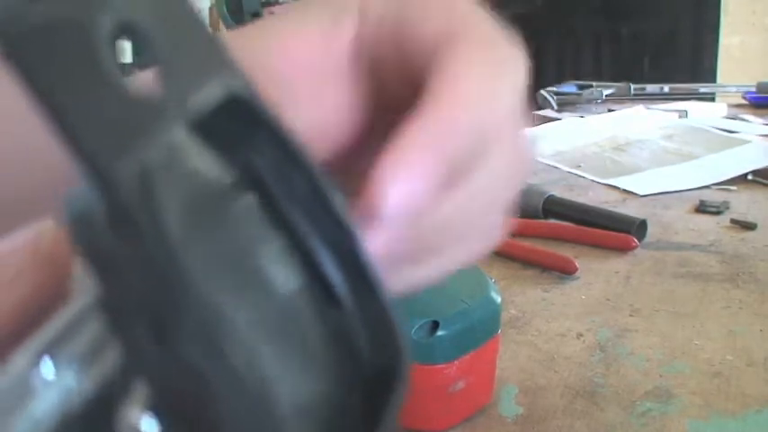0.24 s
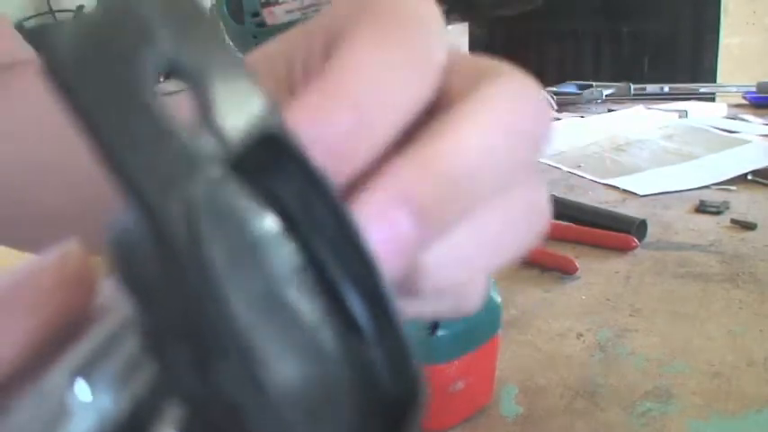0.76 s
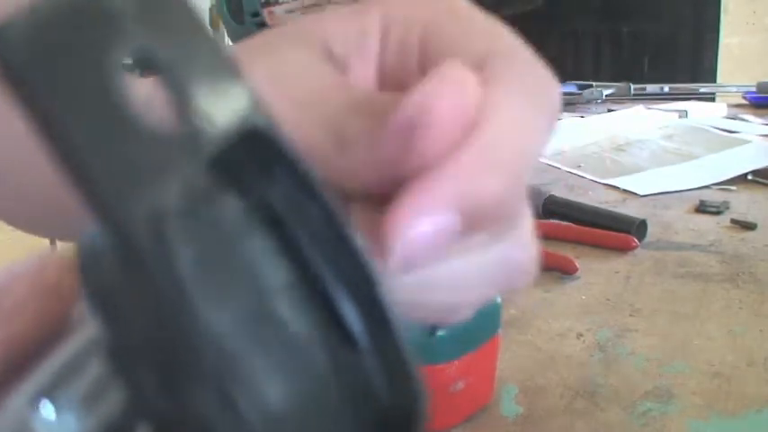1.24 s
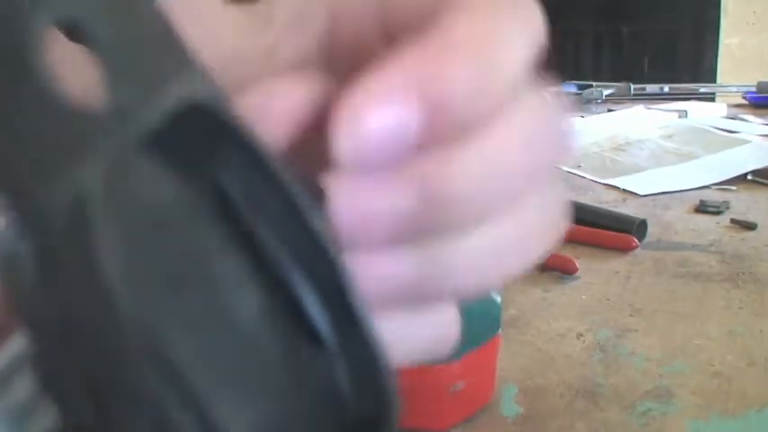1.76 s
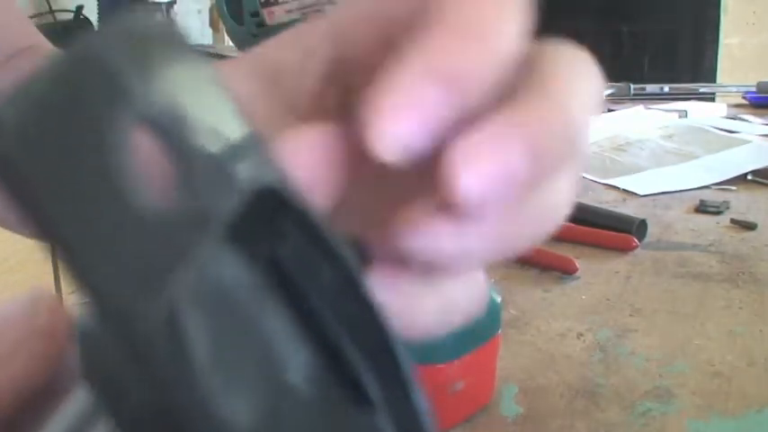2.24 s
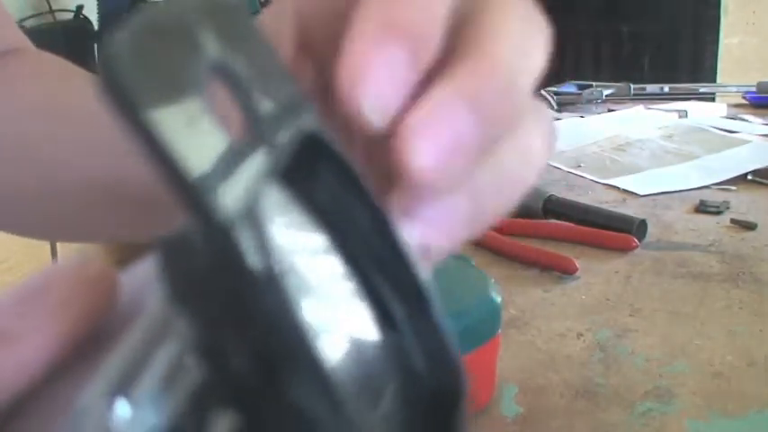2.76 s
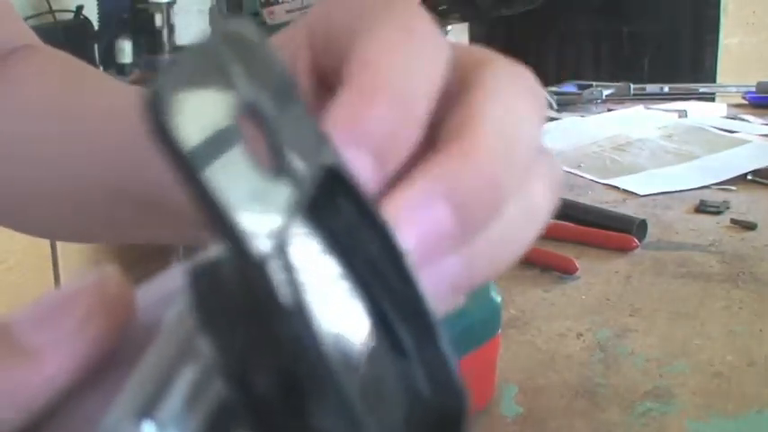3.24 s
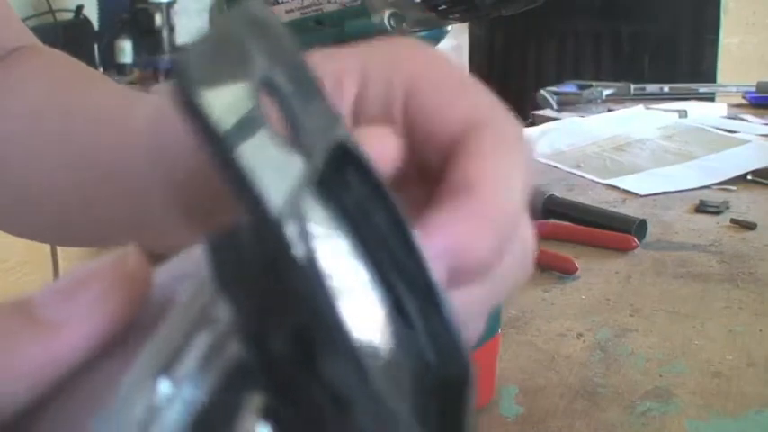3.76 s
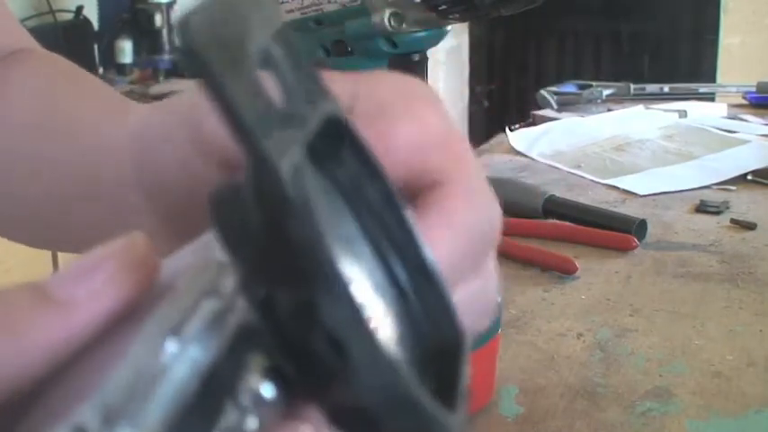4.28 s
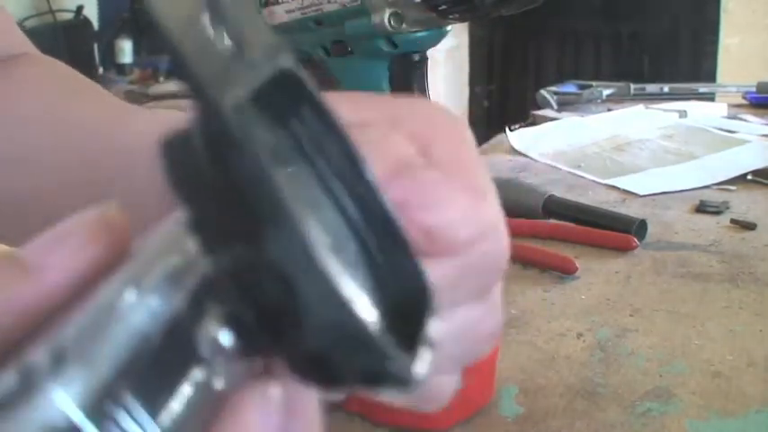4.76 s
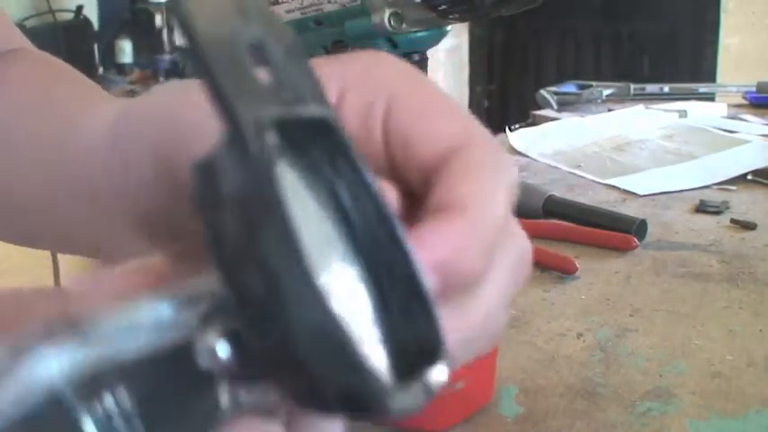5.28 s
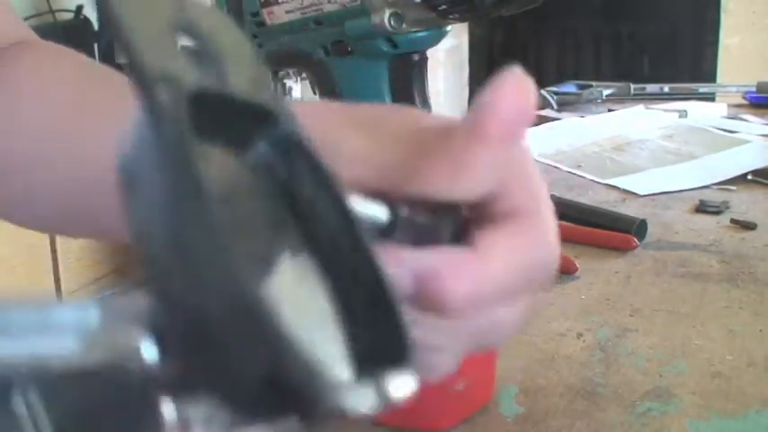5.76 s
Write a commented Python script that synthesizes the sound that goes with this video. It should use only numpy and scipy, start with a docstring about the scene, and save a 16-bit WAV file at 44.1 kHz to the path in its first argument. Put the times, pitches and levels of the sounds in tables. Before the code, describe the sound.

In a quiet workshop, hands loosen a small hollow plastic part right beside the microphone. Light ticks and skin or plastic rubs start at once, a high chirping squeak jumps out before the first second ends, and uneven taps continue. After a quieter spell, parts clatter and snap sharply, the loudest moment, then a final tap. Steady soft hiss and low throbbing hum lie beneath.

```python
"""Soft workshop hiss and hum come first, with a faint thread squeak, then rubs and taps right at the microphone.
Fingers unscrew a plastic housing from its mount, close to a small stereo microphone in a quiet workshop.
Taps, rubs and one loud clatter are noise pushes that ring the shell's modes; squeaks are stick-slip tones.
The room answers with decaying noise echoes; hiss, two beating hums and a far rumble lie beneath."""
import sys
import numpy as np
from scipy import signal
from scipy.fft import rfft, irfft
from scipy.io import wavfile
from scipy.ndimage import uniform_filter1d

SR = 44100
rng = np.random.default_rng(int(sys.argv[2]) if len(sys.argv) > 2 else 0)


def master_out(mix):
    """Clip the mix to full scale and print it as 16-bit PCM to the path in sys.argv[1]."""
    frames = np.transpose(np.atleast_2d(mix))
    ceiling = np.clip(frames, -1, 1)
    pcm = np.round(ceiling * 32767).astype(np.int16)
    wavfile.write(sys.argv[1], SR, pcm)


N = 265482
T = np.arange(N) / SR
HZ = np.arange(N // 2 + 1) * SR / N


def undb(db):
    """Decibels to gain."""
    return 10 ** (np.asarray(db) / 20)


def on_log(hz, table, column):
    """Read a column of a frequency table on a log axis."""
    table = np.array(table, float)
    return np.interp(np.log(np.maximum(hz, 1)), np.log(table[:, 0]), table[:, column])


def walk(rate):
    """Random levels held 1 / rate s and slewed twice; spread near 1."""
    hold = int(SR / rate)
    steps = np.repeat(rng.standard_normal(N // hold + 1), hold)
    return 1.7 * uniform_filter1d(uniform_filter1d(steps, hold), hold)[:N]


def pair(like):
    """Spectra of two noises, as alike in each band as the table says."""
    likeness = np.clip(on_log(HZ, like, 1), 0, 1)
    mid = rfft(rng.standard_normal(N)) * np.sqrt(1 + likeness)
    side = rfft(rng.standard_normal(N)) * np.sqrt(1 - likeness)
    return np.array([mid + side, mid - side]) / 2 ** .5


def add(out, sound, s):
    """Mix a sound in at a time in seconds."""
    i = max(int(s * SR), 0)
    out[i:i + len(sound)] += sound[:N - i]


# spectrum of the workshop hiss: [f/Hz, relative level/dB per Hz]
HISS_SPECTRUM = [(20, -16), (55, -7), (200, -4), (450, -1.5), (800, 0), (1400, -4), (2300, -6.5),
                 (4100, -14), (6400, -15), (8500, -18), (11000, -21), (12000, -17.5), (14000, -20.5),
                 (15500, -29.5)]
# how alike the hiss is at the two ports: [f/Hz, left-right likeness/0..1]
HISS_LIKENESS = [(30, 0.91), (80, .93), (150, 0.2), (300, 0.2), (700, 0.27), (3000, 0.27), (9000, 0.2),
                 (11500, 0.99)]
# two far machines that beat: [mean f/Hz, middle level/dB]
HUM_TONES = [(66.3, -77), (69.8, -74)]
# a far rumble swells and fades: [t/s, level/dB]
RUMBLE_SWELL = [(1.0, -90.5), (1.3, -81), (1.75, -65), (2.1, -68), (2.4, -90)]
HISS_DB, RUMBLE_BAND_HZ = -59, (250, 354)


def air():
    """Workshop air: hiss that swells a little, a throbbing hum of wandering tones and a passing band of rumble."""
    hiss = irfft(pair(HISS_LIKENESS) * undb(on_log(HZ, HISS_SPECTRUM, 1)), N)
    hiss = hiss * undb(0.63 * walk(3.3))
    hum = np.zeros(N)
    for hz, db in HUM_TONES:
        level = undb(db + 1.5 * walk(4.8))
        phase = 2 * np.pi * np.cumsum(hz * (1 + 0.027 * walk(5.5))) / SR
        hum += level * np.sin(phase)
    band = signal.butter(2, RUMBLE_BAND_HZ, "bandpass", fs=SR, output="sos")
    far = signal.sosfilt(band, rng.standard_normal((2, N)))
    rumble = far / far.std() * undb(np.interp(T, *np.transpose(RUMBLE_SWELL)))
    return undb(HISS_DB) * hiss / hiss.std() + hum + rumble


# the thread sticks and slips, close to the microphone: [loudest moment t/s, swell/ms, hold/ms,
# slip rate from f/Hz, slip rate to f/Hz, peak grip level/dB, fundamental level against octave/dB]
THREAD_SQUEAKS = [(.005, 8, 30, 3280, 3270, -50, -1), (0.8, 2.83, 3.43, 3750, 3080, -5.5, -5),
                  (.8068, 3.2, 4.6, 3150, 3300, -21, 4.5), (0.8202, 8, 4, 3400, 3610, -23, 6.5),
                  (0.8262, 2.6, 5.2, 3127, 3003, -7, -3.5)]
# overtones of the slip rate: [multiple, relative level/dB]
SQUEAK_OVERTONES = [(2, 1.5), (3, -13.5), (4, -21.5)]
SQUEAK_START_DB, SQUEAK_HOLD_DB = -36, -6  # against the peak
SQUEAK_DROP_MS, SQUEAK_END_MS = 1.2, 2.4


def squeaks():
    """Stick-slip at a gliding, unsteady rate, with its octave: it bites, eases, holds and lets go."""
    out, waver, flutter = np.zeros(N), walk(900), walk(700)
    for s, swell, hold, from_hz, to_hz, db, first_db in THREAD_SQUEAKS:
        ms = (T - s) * 1000
        glide = np.interp(ms, [-swell, .7 * hold], [from_hz, to_hz])
        phase = 2 * np.pi * np.cumsum(glide * (1 + 0.013 * waver)) / SR
        tone = undb(first_db) * np.sin(phase)
        for multiple, overtone_db in SQUEAK_OVERTONES:
            tone += undb(overtone_db) * np.sin(multiple * phase)
        tone *= 1 + 0.054 * rng.standard_normal(N)  # grit in the contact roughens every slip
        grip_db = np.interp(ms, [-swell, 0, SQUEAK_DROP_MS, hold, hold + SQUEAK_END_MS],
                            [SQUEAK_START_DB, 0, SQUEAK_HOLD_DB, SQUEAK_HOLD_DB, SQUEAK_START_DB], -120, -120)
        out += uniform_filter1d(undb(db + grip_db + 1.2 * flutter), size=40) * tone
    return out


# modes of the shell and mount: [nominal f/Hz, relative level/dB, t60/s]
SHELL_MODES = [(260, -17.5, 0.025), (450, -11.5, 0.025), (733, -5, 0.025), (1050, -3.5, 0.012),
               (1383, 3, 0.013), (1620, -3, 0.0076), (1853, 2, 0.031), (2188, 1, 0.0025),
               (2774, -2.5, 0.0087), (2967, -2, 0.006), (3400, -8, 0.014), (3866, -3, 0.0045),
               (4320, -2.5, 0.0068), (4824, -5.5, 0.0066), (5410, -4, 0.0042), (5792, -3.5, 0.008),
               (6387, 3.5, 0.0053), (6790, 2, 0.0037), (7525, 0.5, 0.0034), (8350, -6.5, .003),
               (8780, -10.5, 0.0063), (9804, -8.5, 0.0024), (10180, -8, 0.002), (12400, -33, .003),
               (13300, -21.5, .0025)]


def ring(push, body_db, note_db, edge_db, luck):
    """The shell modes answer a push; the place of contact picks which of them sound."""
    hz, db, t60 = np.transpose(SHELL_MODES)[:, :, None]
    t = np.arange(1500) / SR
    # a contact that sounds the hollow note also sounds a thin whistle high above it
    whistle_db = edge_db + .5 * note_db + 6.5
    colour = on_log(hz, [(1360, body_db), (1880, note_db), (2250, 0), (4200, 0.0024), (6500, edge_db),
                         (8350, edge_db), (8850, whistle_db), (9600, edge_db)], 1)
    # each contact detunes the modes and shifts their levels slightly
    hz = hz * (1 + .012 * luck[0, :, None])
    level_db = db + colour + .9 * luck[1, :, None]
    sign = (-1.) ** np.arange(len(hz))[:, None]  # neighbours of opposite sign leave no deep gaps between them
    modes = sign * undb(level_db - 60 * t / t60) * np.sin(2 * np.pi * hz * t)
    return signal.fftconvolve(push, modes.sum(axis=0))


# rubs of skin or plastic on plastic, and one loud clatter of hard plastic parts at 5.59 s, close to the microphone:
# [loudest moment t/s, swell/ms, level of the ringing/dB, dull body level/dB, sharp edge level/dB]
RUBS_AND_CLATTER = [(.04, 6.5, -52, -7, 0), (.1, 17, -41.5, -27, 4), (.116, 7.1, -39, -4.5, -7),
                    (.22, 12, -59, -5, 5), (.421, 20, -52.5, -8, 7), (.443, 7.5, -36, -18, 0.5),
                    (.576, 16, -58.5, -3, 8), (0.734, 15, -58, -21, 2), (1.098, 7.8, -47.5, 0, 8.5),
                    (1.15, 23, -56, -4, 2), (1.183, 11.4, -37.5, -14.5, 6), (1.563, 24, -53, -18, 5.5),
                    (1.588, 7.1, -42, -14, 2.5), (1.641, 10, -52, -10.5, 0), (1.726, 15, -54, -10, 3),
                    (1.774, 7, -46, -7, 4), (1.965, 32, -54.5, -6, 4.5), (2.076, 15.4, -39.5, -10.5, 4.5),
                    (2.21, 18, -64, -10, 13), (2.434, 21.6, -46, -8, 3), (2.532, 17, -50.5, -14, 3),
                    (2.884, 33, -55, -26, 4), (2.92, 13.4, -45, -15, 2.5), (2.981, 8.1, -48.5, -5.5, 0),
                    (3.337, 29, -50, -12, 2.5), (3.734, 19, -49, -5.5, 3), (3.799, 18, -49, -12, 3.5),
                    (4.057, 5.5, -48.5, -8, -6), (4.134, 9.1, -55, -8, -2), (4.194, 20, -55, -13, 2),
                    (4.268, 23, -49, -28, 2.5), (4.645, 25, -57, -14, 5), (4.688, 14.3, -48.5, -2, 2),
                    (4.984, 5.4, -54, -5, -0.5), (5.066, 13.5, -50, -18, 2.5), (5.172, 13.6, -59, -10, 7),
                    (5.494, 52, -57, -15, 4), (5.5913, 6, -15.5, -15, -0.5), (5.612, 9.3, -31.5, -16, -6)]
RUB_FADE, RUB_NOTE_DB = 1.3, -13.5  # fade time against swell time; level of the hollow note


def rubs():
    """Dense tiny slips or knocks of uneven size ring the shell, swelling and fading with the movement."""
    out, t = np.zeros(N), np.arange(-5000, 5000) / SR
    luck = rng.standard_normal((len(RUBS_AND_CLATTER), 2, len(SHELL_MODES)))
    shape = (len(RUBS_AND_CLATTER), len(t))
    pushes = rng.standard_normal(shape) * undb(2.0 * rng.exponential(size=shape))
    for (s, swell, db, body_db, edge_db), chance, noise in zip(RUBS_AND_CLATTER, luck, pushes):
        movement = np.exp(-(t * 1000 / swell / np.where(t < 0, 1, RUB_FADE)) ** 2)
        ringing = ring(noise, body_db, RUB_NOTE_DB, edge_db, chance)[:len(t)]
        # sharp contacts also hiss straight into the air
        contact_hiss = undb(edge_db - 11) * np.diff(noise, prepend=0) / noise.std()
        sound = ringing / ringing.std() + contact_hiss
        cut = max(-int((s + t[0]) * SR), 0)  # samples that fall before the start
        add(out, (undb(db) * movement * sound)[cut:], s + t[0])
    return out


# taps and snaps on the housing, close to the microphone: [t/s, peak level of the ringing/dB,
# dull body level/dB, hollow note level/dB, sharp edge level/dB, chatter level against the first contact/dB]
PART_TAPS = [(.051, -20.5, -8.5, -21, 14, 2), (.056, -24, -14, -13, -27, -0.5),
             (.112, -30.5, 6, -32, -11, -13), (0.236, -30, -9.5, -2, -16, 12),
             (.255, -33.5, 6.5, -21, 2, 9), (.273, -16, -9, -10, -5.5, -1), (.363, -33.5, 2.5, -5, 10, 0.5),
             (.375, -46, -1, -21, -1, -10), (.461, -18.5, -13, -6, -15, 0), (0.606, -29, -8, -8, -15, 0.5),
             (.689, -34, 1, -3.5, -5.5, 21), (0.958, -32.5, -3.5, 0, -7, 1), (1.219, -36, 0, -12, -23, 12),
             (1.37, -36, -7, 4.5, 3, -0.5), (1.472, -33, -12.5, -10, 3.5, 5.5),
             (1.589, -26, -11, -9, -15, 12), (1.716, -32.5, -11, 0, 5, 0), (1.73, -30, -14, 4.5, 8.5, 4),
             (1.748, -37.5, 4, -19, -3, -1), (1.762, -32, 2, 14, 11, -2.5), (1.778, -33.5, -13, 11, 9, -2),
             (1.855, -42, 2, -24, -8, 2.5), (1.943, -38.5, -2.5, -0.5, 7, 6),
             (2.143, -37.5, -6, -6.5, -34, 6), (2.443, -30, -6, -33, -3.5, 4), (2.572, -42, 0, -9, -11, 8),
             (2.584, -38.5, -1, -13, -3, -9), (2.809, -34, -15, -10.5, -11.5, -9),
             (2.821, -38, -10, -24, -9, -7), (2.962, -33, -23, -18, 4, 5), (3.173, -44, 2.5, -19, -13, 4.5),
             (3.341, -26, -6.5, -30, -9, 4), (3.353, -21.5, -40, -14, -23, 0),
             (3.374, -23.5, -10, -14, -9.5, 6.5), (3.471, -25, -10.5, -12, -16, 0.5),
             (3.496, -37, 1, -10, 0, -10), (3.633, -43, -17, -6.5, -11, 11),
             (3.785, -34.5, -10, -18, -20, 16), (3.81, -34.5, 5, 0, -13, 3.5),
             (3.839, -21, -20.5, -9, -30, -8), (3.878, -33, -6, -28, -20.5, 10),
             (4.059, -30.5, -12, -3.5, -28, 2), (4.1, -36.5, -7, -7, -18, -7),
             (4.229, -37.5, 5, -23.5, -20.5, 2), (4.247, -34, -5, -28, -11, -6),
             (4.317, -34.5, -8.5, -26.5, -8.5, -5), (4.562, -41, 3.5, -16, -31, 7),
             (4.791, -44, 3, -6, -23.5, -6.5), (4.973, -43, -3, -21.5, -4.5, -1),
             (4.993, -39, 0, -13, -16, -3.5), (5.055, -27, -3.5, -27, -13, -0.5),
             (5.333, -39, -12, -5, -14, -11), (5.341, -21.5, -9.5, -27, -11.5, 3),
             (5.449, -40, -3, -17, -32, -6), (5.531, -39, -6, -17, -16, -4),
             (5.559, -27.5, -6.5, -22, -9, -7), (5.582, -21, -9, -24, -4, 4),
             (5.6394, -6, -25, -18, 3.5, -1.5), (5.645, -16, -15.5, -8, 0, 3),
             (6.006, -19, -12.5, -11, -9, 7), (6.011, -16, 0, -30, -0.5, 2)]
CHATTER_MS = 4.3  # decay time constant


def taps():
    """Each tap is one sharp contact and a short chatter of smaller ones, ringing the shell."""
    out, t = np.zeros(N), np.arange(1500) / SR
    luck = rng.standard_normal((len(PART_TAPS), 2, len(SHELL_MODES)))
    grit = rng.standard_normal((len(PART_TAPS), len(t)))
    for (s, db, body_db, note_db, edge_db, chatter_db), chance, noise in zip(PART_TAPS, luck, grit):
        chatter = noise * np.exp(-t * 1000 / CHATTER_MS)
        first_contact = (t == 0)
        push = undb(chatter_db) * chatter / np.sqrt(np.sum(chatter ** 2)) + first_contact
        ringing = ring(push, body_db, note_db, edge_db, chance)
        add(out, undb(db) * ringing / np.abs(ringing).max(), s)
        # the contact itself cracks into the air
        crack = np.diff(push, 2) / np.abs(push).max()
        add(out, undb(db + .6 * edge_db - 13) * crack, s)
    return out


# echo of the workshop: [f/Hz, t60/s, relative level/dB]
ROOM_DECAY = [(305, 0.41, -11), (1020, 0.4, -6), (2000, 0.42, -9.5), (4000, 0.36, -9.5), (6500, 0.34, -9.5),
              (8800, .33, -8.5), (13000, 0.28, -5.5)]
# how alike the echo is at the two ports: [f/Hz, left-right likeness/0..1]
ECHO_LIKENESS = [(200, .3), (600, 0.28), (2000, 0.89), (4000, 0.68), (6500, 0.81), (9000, 0.1),
                 (11500, 0.9)]


def room(x):
    """Dense echoes that build up in a few ms and die sooner in the treble, partly shared by both ports."""
    t, tail, noise = T[:int(.7 * SR)], 0, pair(ECHO_LIKENESS)
    for k, (hz, t60, db) in enumerate(ROOM_DECAY):
        # overlapping slices that add up to the whole spectrum, each fading at its own pace
        share = on_log(HZ, [(row[0], j == k) for j, row in enumerate(ROOM_DECAY)], 1)
        band = irfft(noise * share, N)[:, :len(t)]
        length_norm = np.sqrt(t60 * SR / (2 * np.log(1000)))
        tail = tail + band * undb(db - 60 * t / t60) / length_norm
    build_up = np.clip(t / 0.0047, 0, 1)
    return signal.fftconvolve(x[None], tail * build_up, axes=1)[:, :N]


def scene():
    """Hands near the microphone, their echo, and the quiet workshop."""
    # parts this small push no air in the bass, and little at the very top
    band = signal.butter(3, [250, 12500], "bandpass", fs=SR, output="sos")
    hands = signal.sosfilt(band, taps() + rubs() + squeaks())
    return hands + room(hands) + air()


# balance of the two microphone ports: [f/Hz, left minus right level/dB]
PORT_BALANCE = [(60, 0.5), (250, 0.64), (1000, 0.5), (2000, 3), (4000, 2), (8000, 1.5), (11500, 1.35)]
TOP_HZ = 15800


def record(dry):
    """The left port is a little louder, most of all in the middle range; the recorder cuts the top."""
    lean = undb(on_log(HZ, PORT_BALANCE, 1) / 2 * np.array([[1], [-1]]))
    top_cut = signal.ellip(10, .2, 90, TOP_HZ, fs=SR, output="sos")
    return signal.sosfilt(top_cut, irfft(rfft(dry) * lean, N))


dry = scene()
out = record(dry)
master_out(out)
```